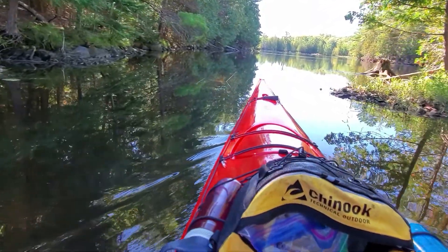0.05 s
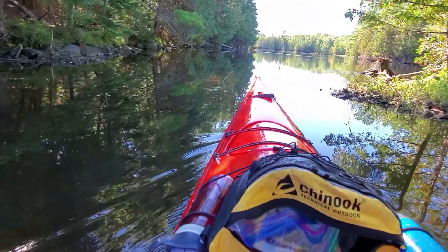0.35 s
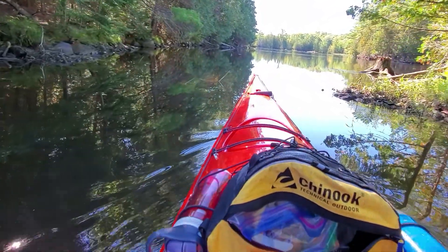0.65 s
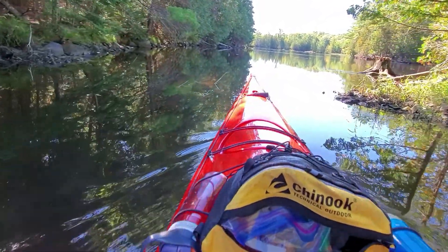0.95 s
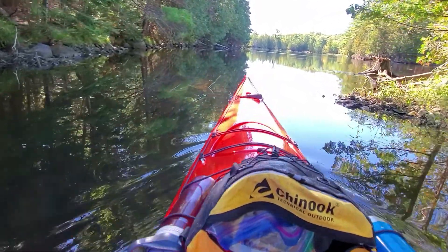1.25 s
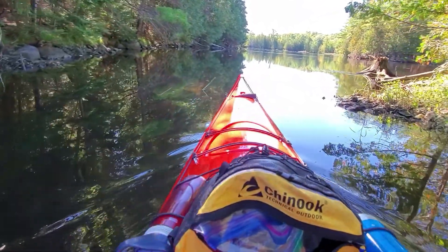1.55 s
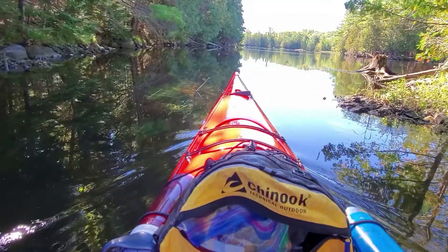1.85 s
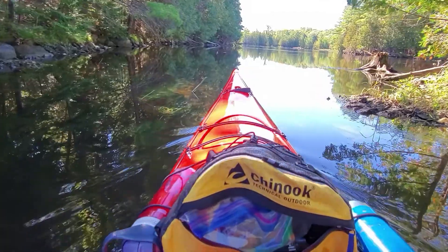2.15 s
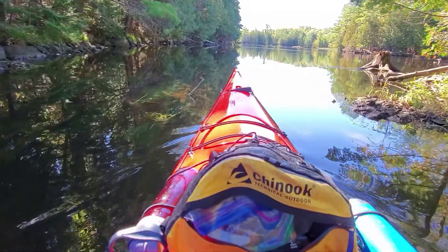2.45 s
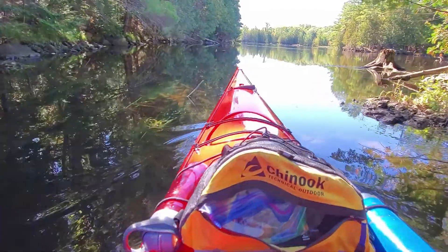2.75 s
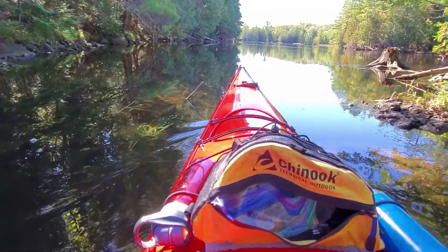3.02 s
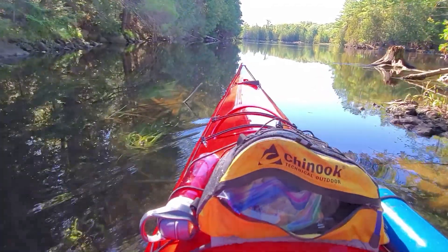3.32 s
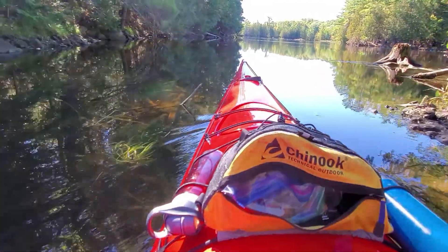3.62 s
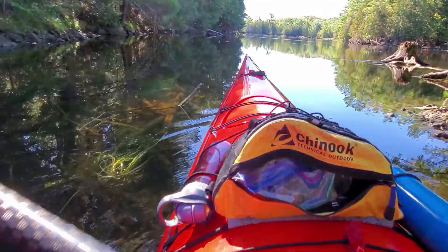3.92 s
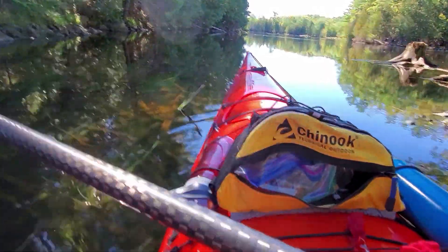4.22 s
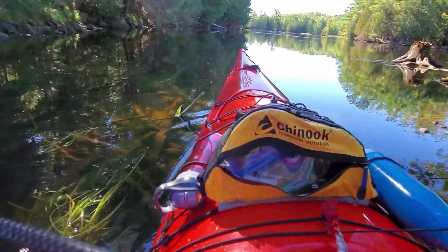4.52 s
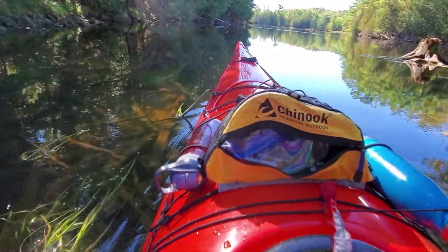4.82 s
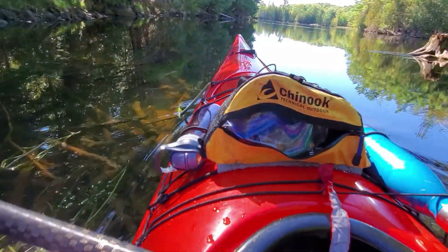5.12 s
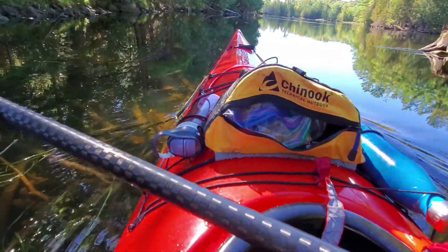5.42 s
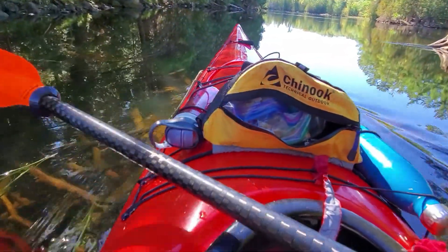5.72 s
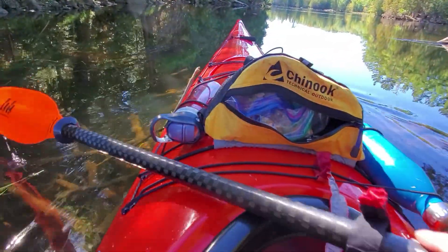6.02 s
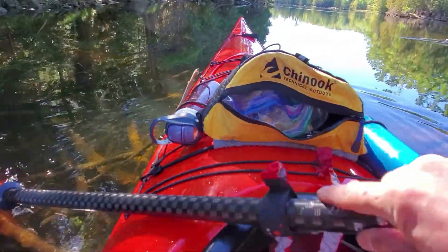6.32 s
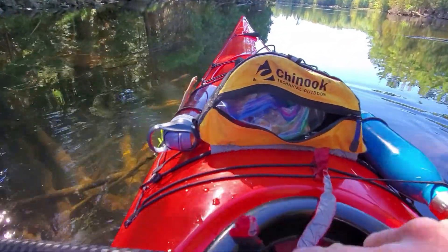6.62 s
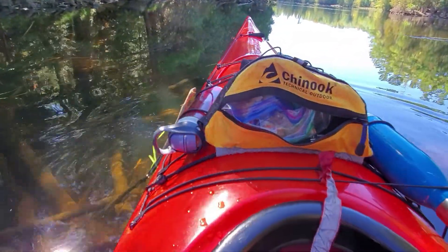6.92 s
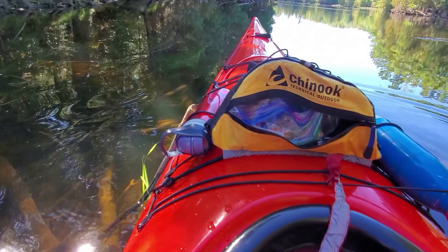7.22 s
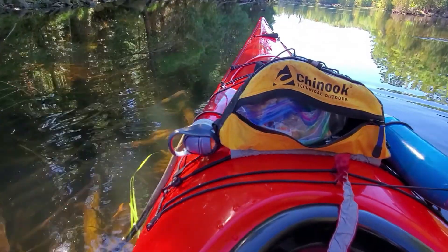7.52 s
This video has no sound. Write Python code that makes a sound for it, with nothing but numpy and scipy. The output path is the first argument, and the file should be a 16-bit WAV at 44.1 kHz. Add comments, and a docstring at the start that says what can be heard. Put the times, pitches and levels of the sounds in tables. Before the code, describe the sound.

A plastic kayak glides on a calm lake, heard close from on board: a soft low hull hum, pattering ripples, small laps and faint grass brushing the side. From about 1.5 to 2 seconds, water plops and splashes on the left, followed by light drips and a trickle. Soft low bumps come around 3 seconds. From 4 to about 5.3 seconds the hull drags over weeds and the bottom, booming and rumbling with a gritty rasp and tiny wet squeaks, ending in a short low groan. Hollow knocks from the paddle and sunken wood start at about 4 and 5 seconds, then come several times, loudest between 6.3 and 7 seconds, with a last one near 7.6. Wavelets slosh against the shell and a few drops tick between the knocks. Distant insects sing very faintly throughout, swelling slightly around 5 seconds.

```python
"""Ripples patter and lap on the hollow hull of a plastic kayak on a calm, shallow lake; water drips and
splashes on the left. The hull booms and rasps as it drags over weeds and the bottom, then the paddle
and sunken wood knock against it. Insects sing on the shore.
Stick-slip friction drives the shell's resonances, blows ring the hull's modes, and drops and splashes
trap ringing bubbles. The insects are two bands of noise."""
import sys
import numpy as np
from scipy import signal
from scipy.io import wavfile
from scipy.ndimage import uniform_filter1d

SR = 44100
rng = np.random.default_rng(int(sys.argv[2]) if len(sys.argv) > 2 else 0)


def wav_out(sig):
    """Save sig, one row per channel (or a flat mono array), as 16-bit PCM at SR to the path in sys.argv[1]."""
    wavfile.write(sys.argv[1], SR, np.round(np.clip(np.atleast_2d(sig).T, -1, 1) * 32767).astype(np.int16))


N = 342216
TIME = np.arange(N) / SR

# Hull modes, lowest first. Each row: frequency in Hz, relative level in dB, T60 in seconds.
HULL_MODES = [(39.7, -19.5, 1), (64, -6, 0.58), (74.9, -12.5, 0.87), (86.6, 8.5, 0.28), (112.5, -3, 0.32),
              (168.5, -2, 0.22), (231.5, 5, 0.17), (276.5, 3.5, 0.076), (312.8, 2, 0.1), (381, 2.5, 0.1),
              (481, -5.5, 0.092), (545.4, -0.5, 0.11), (602, -7, 0.14), (691, -7, 0.069),
              (837, -13.5, 0.15), (1130, -20.5, 0.16), (1410, -18.5, 0.07)]
# Stereo image of the noises. Each row: frequency in Hz, left-right correlation.
CORRELATION = [(60, 0.86), (300, 0.86), (600, 0.72), (1000, 0.096), (2000, 0), (15000, 0)]


def dragging():
    """Weeds and grit slip along the shell: it booms, lower under load, rumbles, rasps and hisses."""
    # Spectra. Each row: frequency in Hz, relative density in dB.
    wall_spectrum = [(120, -11), (230, 3.5), (400, -8.5), (580, -1), (850, -7), (1300, -10)]
    rasp_spectrum = [(700, 2), (1200, -1.5), (1800, 1.5), (2800, -1.5), (4200, 2), (6000, -50),
                     (9000, -12.5)]
    hiss_spectrum = [(3500, 4.5), (5500, -0.5), (7000, 1.5), (8500, -7), (11000, -6.5), (15000, 3.5)]
    boom, wall, rasp, hiss = contact()
    push = rng.standard_normal(N)
    boom_hz = 79.1 * (1 + 0.071 * drift(30) - 0.1306 * boom / boom.max())
    low = np.sin(2 * np.pi * np.cumsum(boom_hz) / SR)
    low += from_db(-9) * evened(resonate_twice(push, 57, 73, 73), 0.056)
    rumble = from_db(1) * wall * shell(friction(wall_spectrum, grain_db=2, grain_hz=149.4, patchy_db=3))
    grit = friction(rasp_spectrum, grain_db=5.5, grain_hz=330, patchy_db=3.5)
    surface = rasp * (from_db(-6) * shell(grit) + squeaks())
    fine_grit = friction(hiss_spectrum, grain_db=-1, grain_hz=397, patchy_db=1.5)
    surface += from_db(1) * hiss * shell(fine_grit)
    return from_db(0.5) * boom * low + rumble + surface * pan(0.83)


def contact():
    """Gains of boom, wall, rasp and hiss: scrape pressure drives all four, bumps only the boom."""
    # Clumps of weeds. Each row: time of full pressure, hold, attack and release in seconds,
    # hiss level in dB, rasp over hiss in dB.
    scrapes = [(4.111, 0.1, 0.018, 0.035, -38, 11), (4.389, 0.058, 0.1, 0.25, -33.5, 6.5),
               (4.606, 0.033, 0.2, 0.18, -35, 0.5), (4.818, 0.065, 0.25, 0.19, -38.5, 0),
               (5.033, 0.038, 0.047, 0.16, -38, 8), (5.168, 0.0092, 0.038, 0.016, -37.5, 2),
               (5.259, 0.049, 0.21, 0.037, -53.5, -27)]
    # The hull rides up on the bottom. Each row: peak time and hold in seconds, level in dB.
    bumps = [(2.674, 0.015, -41), (3.03, 0.022, -37), (3.119, 0.023, -34.5), (3.232, 0.016, -28.5),
             (3.326, 0.016, -37), (4.13, 0.039, -19), (4.338, 0.027, -24.5), (4.472, 0.012, -29),
             (4.991, 0.11, -28), (5.268, 0.03, -30)]
    rasp, hiss = 0, 0
    for s, hold_s, attack_s, release_s, db, rasp_db in scrapes:
        pressure = from_db(db) * swell(s, hold_s, attack_s, release_s)
        rasp = np.maximum(rasp, from_db(rasp_db) * pressure)
        hiss = np.maximum(hiss, pressure)
    boom = from_db(-4) * hiss
    for s, hold_s, db in bumps:
        boom = np.maximum(boom, from_db(db) * swell(s, hold_s, attack_s=0.053, release_s=0.11))
    wall = from_db(-36.5) * (rasp / rasp.max()) ** 0.68
    return boom, wall, rasp, hiss


def knocks(lag_s, mode_spread_db, rebound_s, focus_db):
    """Each blow cracks the shell and rings the hull modes; bending waves bring the low ones later."""
    # Each row: start in seconds, relative levels of wall, boom and crack in dB, favoured pitch in Hz,
    # then the struck spot's own ring: pitch and width in Hz, level in dB.
    blows = [(3.206, -40, -55, -82, 220, 583, 148, -43.5), (4.09, -42, -26, -69, 393, 232, 99, -30),
             (5.04, -27.5, -50, -43, 586, 1100, 400, -23.5), (5.27, -29, -32, -45.5, 520, 1340, 400, -34.5),
             (5.654, -28.5, -33.5, -35, 607, 712, 116, -29), (6.02, -31, -30, -42.5, 210, 1430, 600, -31),
             (6.323, -12, -19, -24, 533, 1680, 445, -21), (6.562, -18, -20, -26, 327, 1800, 685, -13),
             (6.713, -21, -25.5, -29.5, 297, 3380, 200, -25),
             (6.829, -25.5, -20.5, -48, 303, 403, 220, -29), (7.003, -14.5, -23, -28, 286, 328, 199, -14),
             (7.618, -23.5, -38, -36.5, 620, 780, 349, -24.5)]
    # Crowded upper shell modes. Each row: frequency in Hz, relative density in dB, T60 in seconds.
    crack_modes = [(630, 12, 0.083), (960, 2.5, 0.088), (1750, 3, 0.033), (2600, -6, 0.051),
                   (3440, -3.5, 0.025), (6700, -12.5, 0.011), (14000, -12.5, 0.011)]
    out, t = np.zeros((2, N)), TIME[:SR // 2]
    crack_age_s = np.maximum(t[:SR // 8] - rebound_s, 0)
    for s, wall_db, boom_db, crack_db, favoured_hz, ring_hz, width_hz, ring_db in blows:
        boom, wall, crack = 0, 0, 0
        for hz, db, t60_s in HULL_MODES:
            age_s = np.maximum(t - lag_s * np.sqrt(HULL_MODES[0][0] / hz), 0)
            onset = 1 - np.exp(-2 * hz * age_s)
            decay = from_db(db + mode_spread_db * rng.standard_normal() - 60 * age_s / t60_s)
            mode = onset * decay * np.sin(2 * np.pi * hz * age_s)
            if hz < 140:
                boom += mode
            else:   # the struck spot favours modes near one pitch
                favour = from_db(focus_db * np.exp(-(np.log2(hz / favoured_hz) / 0.38) ** 2))
                wall += rng.choice([-1, 1]) * favour * mode * pan(rng.normal(0.99, 2.6))
        white = rng.standard_normal((2, 2, SR // 8))
        for hz, band in bands(white, crack_modes[0][0], crack_modes[-1][0]):
            db, t60_s = at_hz(crack_modes, hz)
            crack += band * from_db(db - 60 * crack_age_s / t60_s)
        add(out, s, from_db(boom_db + 4) * peak_one(boom) + from_db(wall_db + 4) * peak_one(wall))
        add(out, s, from_db(crack_db - 7) * rms_one(shell(crack)) * pan(3.7))
        touch = stereo_noise(len(t), ring_hz) * np.exp(-t / 0.0044)
        ring = resonate_twice(touch, ring_hz, width_hz, 2 * width_hz)
        add(out, s, from_db(ring_db) * peak_one(ring))
    return out


def shell(x):
    """Ring the shell's narrow upper resonances; rms unchanged."""
    # Each row: frequency and width in Hz, gain in dB.
    resonances = [(1157, 42, -1), (1313, 38, -4), (1440, 28, 2), (1600, 62, -0.5), (1757, 14, 2),
                  (1970, 23, -3), (2310, 12, -1), (2817, 47, 1.5), (4090, 34, 1)]
    ringing = sum(from_db(db) * resonate(x, hz, width_hz) for hz, width_hz, db in resonances)
    return rms_one(x + ringing) * np.sqrt(np.mean(x ** 2))


def snags():
    """The hull catches and chatters: coarse slips gather round one resonance."""
    # Each row: centre time and half-length in seconds, pitch in Hz, level in dB.
    catches = [(4.128, 0.018, 1560, -25.5), (4.197, 0.012, 1620, -22), (4.409, 0.074, 1490, -26.5),
               (4.455, 0.026, 1700, -21.5), (4.527, 0.018, 1200, -40), (4.632, 0.024, 355, -36),
               (4.835, 0.055, 2620, -35.5), (5.062, 0.042, 1150, -31.5), (5.827, 0.025, 1490, -43.5),
               (6.213, .012, 1800, -37)]
    out = np.zeros((2, N))
    for s, half_s, hz, db in catches:
        n = int(2 * half_s * SR)
        slips = stereo_noise(n, hz) * from_db(4.5 * drift(450)[:n])
        chatter = evened(shell(resonate_twice(slips, hz, 0.28 * hz, hz)), 0.0098)
        grip = from_db(-40 * np.abs(np.linspace(-1, 1, n)) ** 3)
        add(out, s - half_s, from_db(db) * chatter * grip)
    return out * pan(2.5)


def squeaks(start_s=4.28):
    """For a second, wet stems squeak under the hull, each at its own wavering pitch."""
    out = np.zeros((2, N))
    for delay_s, pitch, length, faintness, place in rng.random((190, 5)):
        hz = 1500 * 4.6 ** pitch
        t = TIME[:int((.012 + .035 * length) * SR)]
        waver = np.cumsum(rng.normal(0, .035, len(t)))
        phase = 2 * np.pi * hz * t + waver + np.pi * place * np.array([[0], [1]])
        envelope = from_db(-14 * faintness - 4 * pitch) * np.hanning(len(t))
        add(out, start_s + delay_s, envelope * np.sin(phase))
    return from_db(-8) * out / out[out != 0].std()


def groan():
    """Regular stick-slip gives a short, low, wavering note with weak overtones."""
    # Each row: time in seconds, pitch in Hz, level in dB.
    contour = [(5.16, 205, -62), (5.174, 202.6, -32.5), (5.225, 181.6, -34), (5.25, 172, -41)]
    s, hz, db = np.transpose(contour)
    phase = 2 * np.pi * np.cumsum(np.interp(TIME, s, hz) * (1 + 0.028 * drift(120))) / SR
    note = sum(gain * np.sin(k * phase) for k, gain in enumerate(from_db([10.5, -2, -4.5, -9.5]), 1))
    return gain_curve(np.transpose([s, db])) * rms_one(note)


def splashes():
    """Water falls beside the boat: plops, gushes of bubbles and spray, then a trickle; a few low plops are air
    gulping under the hull."""
    # Each row: peak time in seconds, relative levels of bubbling and spray in dB.
    gushes = [(1.672, -48, -39.5), (1.775, -28.5, -32), (1.862, -22.5, -25.5)]
    out = plops()
    swarm, spray = 0, 0
    for s, swarm_db, spray_db in gushes:
        gush = swell(s, hold_s=0, attack_s=0.077, release_s=0.069)
        swarm = np.maximum(swarm, from_db(swarm_db) * gush)
        spray = np.maximum(spray, from_db(spray_db) * gush)
    crackle = bubbling(1.55, 2.06, count=750, low_hz=1500, high_hz=5800, cycles=26, spread_db=20)
    mist = bubbling(1.55, 2.06, count=1800, low_hz=8000, high_hz=16000, cycles=12, spread_db=22)
    gurgle = bubbling(1.55, 2.06, count=110, low_hz=650, high_hz=1600, cycles=14, spread_db=12)
    trickle = bubbling(2.35, 3.22, count=170, low_hz=1700, high_hz=6000, cycles=45, spread_db=15)
    out += swarm * (from_db(-4.5) * evened(resonate(crackle, 2900, 8000), 0.018) + from_db(-18) * gurgle)
    out += from_db(-54.5) * swell(2.84, hold_s=0, attack_s=0.89, release_s=0.05) * trickle
    return out * pan(4.7) + from_db(-6.5) * spray * evened(mist, 0.067) * pan(5.5)


def plops(splat_decay_s=0.017):
    """Larger bubbles ring, each with a splat of water; a few low ones are air gulping under the hull."""
    # Each row: start in seconds, pitch in Hz, level in dB, fractional pitch rise over the ring.
    large_bubbles = [(1.474, 2560, -26.5, 2.1), (1.484, 2490, -27, 2.1), (1.666, 938, -32, 0.51),
                     (1.731, 923, -37.5, -0.5), (1.743, 3620, -24, 2.5), (1.752, 944, -32, 1.6),
                     (1.788, 2570, -22.5, 0.5), (1.829, 2820, -28, 0.27), (1.932, 2160, -33.5, 0.83),
                     (2.358, 1790, -44, 0.18), (2.469, 1690, -42, 0.79), (2.493, 723, -46.5, 1.6),
                     (2.628, 2500, -43, 0.5), (2.643, 396, -46, 1.5), (2.814, 4960, -40, 0.35),
                     (2.841, 3400, -37, 0.3), (2.955, 221, -40.5, 0), (3.075, 1840, -44.5, 1.3),
                     (7.219, 1185, -39.5, 0), (7.297, 597, -41, 1.5)]
    out, t = np.zeros((2, N)), TIME[:SR // 20]
    for s, hz, db, rise in large_bubbles:
        splat = resonate_twice(stereo_noise(len(t), hz), hz, hz, hz) * np.exp(-t / splat_decay_s)
        add(out, s, from_db(db - 4) * peak_one(splat))
        add(out, s, from_db(db) * bubble(hz, cycles=77, rise=rise))
    return out


def drops(tick_db, ring_db):
    """A drop lands with a sharp tick and traps a tiny ringing bubble."""
    # Each row: start in seconds, relative level in dB, pitch in Hz, left over right in dB.
    landings = [(0.9472, -36.5, 5300, 8), (0.967, -34.5, 14200, 0), (1.2696, -30, 14000, -3),
                (1.5375, -31, 13400, 8), (1.6597, -25.5, 5150, 6), (1.686, -26, 4730, 9),
                (1.8727, -16.5, 14300, 28), (2.835, -30.5, 5350, 17), (2.9, -27, 14200, 13),
                (3.588, -30, 6770, 6), (3.765, -29.5, 15200, 24.5), (6.2087, -21, 4110, 5),
                (6.209, -21.5, 10800, 12.5), (6.256, -34, 12500, 6), (6.273, -36, 10900, 6),
                (6.521, -27, 14400, 3), (6.9014, -28.5, 14200, 5), (7.673, -33.5, 8900, 8)]
    out, t = np.zeros((2, N)), TIME[:SR // 30]
    impact = np.exp(-t / .0008) + .03 * np.exp(-t / .006)
    for s, db, hz, left_db in landings:
        burst = rng.standard_normal((2, len(t))) * impact
        tick = resonate_twice(burst, hz, 2200, 4400) + .22 * high_pass(burst, 5000, order=2)
        add(out, s, from_db(db + tick_db) * peak_one(tick) * pan(left_db))
        add(out, s, from_db(db + ring_db) * bubble(hz, cycles=86, rise=0.16) * pan(left_db))
    return out


def laps(hollow_db, attack_s=0.00089):
    """Wavelets slosh against the side: soft, lumpy pushes coloured by the hollow hull."""
    # Each row: start in seconds, seconds to fade 20 dB, peak in dB, pitch in Hz.
    wavelets = [(0.577, 0.1, -45.5, 380), (0.78, 0.035, -40.5, 406), (1.025, 0.028, -46, 605),
                (1.074, 0.026, -49, 564), (1.211, 0.029, -46.5, 480), (1.279, .05, -41, 410),
                (1.329, 0.088, -46, 470), (1.461, 0.22, -42, 395), (2.792, 0.18, -43, 250),
                (3.107, 0.02, -40, 333), (3.939, 0.025, -36, 293), (5.441, 0.16, -30, 480),
                (5.495, 0.031, -38, 480), (5.553, 0.017, -32, 600), (5.775, 0.068, -34, 517),
                (5.952, 0.018, -31, 840), (5.978, 0.016, -31, 600), (6.013, 0.085, -27, 605),
                (7.219, 0.06, -36, 570), (7.673, 0.045, -34, 420), (7.707, 0.059, -39, 477)]
    out, t = np.zeros((2, N)), TIME[:SR // 3]
    for s, fade_s, db, hz in wavelets:
        push = stereo_noise(len(t), hz) * from_db(3 * drift(110)[:len(t)])
        envelope = (1 - np.exp(-t / attack_s)) * from_db(-20 * t / fade_s)
        slosh = evened(resonate_twice(push, hz, hz, 2 * hz), 0.0297) * envelope
        hollow = sum(from_db(mode_db) * resonate(slosh, mode_hz, np.log(1000) / np.pi / t60_s)
                     for mode_hz, mode_db, t60_s in HULL_MODES)
        add(out, s, from_db(db) * peak_one(slosh + from_db(hollow_db) * hollow))
    return out


def gliding():
    """Moving water keeps a low hull mode humming; ripples patter on the shell."""
    # Level curves. Each row: time in seconds, relative level in dB.
    hum_levels = [(0, -47.5), (1, -44.5), (1.7, -49), (1.98, -56.5), (2.42, -44), (3.35, -43.5),
                  (3.55, -44), (6.2, -46), (7.76, -46)]
    ripple_levels = [(0, -66), (.6, -60.5), (.95, -59.5), (1.17, -64), (1.7, -57.5), (2.25, -63.5),
                     (2.7, -59), (5.9, -54.5), (6.5, -47.5), (7.3, -56.5), (7.76, -44)]
    # Each row: frequency in Hz, relative density in dB.
    patter_spectrum = [(110, -4), (170, 3.5), (240, -4.5), (460, -4), (600, -10.5), (800, -16),
                       (1200, -19.5), (2500, -18.5)]
    mode = resonate(rng.standard_normal(N), 75.9, 4.3)
    hum = gain_curve(hum_levels) * evened(resonate(mode, 70, 33), 0.057)
    patter = gain_curve(ripple_levels) * friction(patter_spectrum, grain_db=3, grain_hz=89.4, patchy_db=6.5)
    return from_db(-4) * hum + from_db(1.5) * patter


def grass(bow_db):
    """Tufts rustle and hiss along the side; between them the bow hisses as it parts the water."""
    # Each row: centre time and half-height width in seconds, hiss and rustle levels in dB.
    tufts = [(0.136, 0.11, -55, -61.5), (0.7, 0.29, -55.5, -59.5), (1.954, 0.84, -53.5, -56),
             (2.816, 0.49, -57.5, -56.5), (3.494, 0.46, -50.5, -53), (5.58, 0.49, -59.5, -65.5),
             (6.243, 0.49, -55, -51.5), (6.463, 0.6, -58, -52), (6.904, 0.14, -52.5, -47),
             (7.505, 1, -52.5, -54)]
    # Spectra. Each row: frequency in Hz, relative density in dB.
    rustle_spectrum = [(700, -4), (1200, 1.5), (2000, -5), (3400, 2.5), (4500, -4.5)]
    hiss_spectrum = [(3500, -9.5), (5000, 0), (7000, 2.5), (8500, -6), (11000, 0), (15000, 5.5)]
    rustle, hiss = 0, from_db(bow_db)
    for s, width_s, hiss_db, rustle_db in tufts:
        touch = bell(s, width_s)
        rustle = np.hypot(rustle, from_db(rustle_db) * touch)
        hiss = np.hypot(hiss, from_db(hiss_db) * touch)
    out = rustle * friction(rustle_spectrum, grain_db=2, grain_hz=305, patchy_db=3)
    out += hiss * friction(hiss_spectrum, grain_db=2, grain_hz=393, patchy_db=3)
    return out * pan(1.5)


def paddle_drips():
    """Tiny drips land at random, each a short high tick."""
    ticks = bubbling(0, N / SR, count=110, low_hz=9500, high_hz=15500, cycles=12, spread_db=16)
    return from_db(-71.5) * ticks * pan(1.6)


def shore():
    """A distant insect chorus in two narrow bands, louder for a while, over faint air."""
    # Each row: frequency and width in Hz, level in dB, rise at the loudest in dB.
    insects = [(3960, 690, -67.5, 7), (15000, 2200, -70.5, 4)]
    # Each row: frequency in Hz, relative density in dB.
    air_spectrum = [(30, 9), (60, 26), (150, 10), (500, 12), (1000, -4), (2500, -21), (6000, -6),
                    (15000, -25)]
    chorus = 0
    for hz, width_hz, db, rise_db in insects:
        song = rms_one(resonate_twice(rng.standard_normal((2, N)), hz, width_hz, width_hz))
        chorus += from_db(db + rise_db * bell(5.1, width_s=1.6)) * song
    return chorus + from_db(-63) * friction(air_spectrum, grain_db=-3, grain_hz=29, patchy_db=2)


def friction(spectrum, grain_db, grain_hz, patchy_db):
    """Noise of uneven little slips, its colour wandering band by band; rms about 1."""
    white = rng.standard_normal((2, 2, N)) * from_db(grain_db * drift(grain_hz))
    coloured = sum(band * from_db(at_hz(spectrum, hz) + patchy_db * drift(35))
                   for hz, band in bands(white, spectrum[0][0], spectrum[-1][0]))
    return evened(coloured, 0.19)


def bubble(hz, cycles, rise):
    """A bubble glides in pitch and decays 60 dB in `cycles` periods; the right side lags in phase."""
    age = np.arange(int(cycles / hz * SR) + 8) * hz / SR / cycles
    phase = 2 * np.pi * cycles * (age + rise * age ** 2 / 2)
    lag_rad = np.array([[0], [rng.uniform(0.54, 2.8)]])
    return np.sin(phase - lag_rad) * from_db(-60 * age) * (1 - np.exp(-age * cycles))


def bubbling(start_s, end_s, count, low_hz, high_hz, cycles, spread_db):
    """A swarm of bubbles of random pitch and level; rms 1 over its span."""
    out, span_s = np.zeros((2, N)), end_s - start_s
    for when, pitch, faintness in rng.random((count, 3)):
        ring = bubble(low_hz * (high_hz / low_hz) ** pitch, cycles, rise=0.52)
        add(out, start_s + when * span_s, from_db(-spread_db * faintness) * ring)
    return out / np.sqrt(np.mean(out ** 2) * N / SR / span_s)


def bands(white, low_hz, high_hz):
    """Yield centre Hz and stereo half-octave band, alternating between two mid-side noise pairs."""
    edges_hz = 22 * 2 ** np.arange(0, 10, .5)
    for k, (low, high) in enumerate(zip(edges_hz, edges_hz[1:])):
        if high > low_hz and low < high_hz:
            hz = np.sqrt(low * high)
            sos = signal.butter(2, [low, high], "band", fs=SR, output="sos")
            yield hz, left_right(*signal.sosfilt(sos, white[k % 2]), hz)


def stereo_noise(n, hz):
    """White noise with the stereo correlation at hz."""
    return left_right(*rng.standard_normal((2, n)), hz)


def left_right(mid, side, hz):
    """Mid-side to stereo; the channels agree only for low hz."""
    alike = at_hz(CORRELATION, hz)
    return np.sqrt(1 + alike) * mid + np.sqrt(1 - alike) * side * [[1], [-1]]


def resonate(x, hz, width_hz):
    """Two-pole resonance, peak gain 1."""
    r = np.exp(-np.pi * width_hz / SR)
    feedback = [1, -2 * r * np.cos(2 * np.pi * hz / SR), r * r]
    return signal.lfilter(np.array([1, 0, -1]) * (1 - r * r) / 2, feedback, x + 1e-18)


def resonate_twice(x, hz, width1_hz, width2_hz):
    """Two resonances in series at one pitch."""
    return resonate(resonate(x, hz, width1_hz), hz, width2_hz)


def high_pass(x, hz, order):
    """Cut below hz."""
    return signal.sosfilt(signal.butter(order, hz, "high", fs=SR, output="sos"), x)


def evened(x, span_s):
    """Hold the rms near 1 over span_s; faster grain stays."""
    power = uniform_filter1d(np.mean(np.atleast_2d(x) ** 2, axis=0), max(2, int(span_s * SR)))
    return x / np.sqrt(np.abs(power) + 1e-3 * np.mean(x ** 2))


def swell(s, hold_s, attack_s, release_s):
    """Gain rising 20 dB per attack_s until s, holding at 1, falling 20 dB per release_s."""
    away = np.maximum(s - TIME, 0) / attack_s + np.maximum(TIME - s - hold_s, 0) / release_s
    return from_db(-20 * np.minimum(away, 10))


def bell(s, width_s):
    """Bell-shaped gain centred on s, width_s wide at half height."""
    return .5 ** np.minimum((2 * (TIME - s) / width_s) ** 2, 20)


def gain_curve(points):
    """Gain through (seconds, dB) points, silent from 20 ms outside their span."""
    s, db = np.transpose(points)
    gate = np.interp(TIME, [s[0] - .02, s[0], s[-1], s[-1] + .02], [0, 1, 1, 0])
    return gate * from_db(np.interp(TIME, s, db))


def drift(rate_hz):
    """Random wander, rms 1."""
    knots = rng.standard_normal(4000)
    return rms_one(np.interp(TIME * rate_hz, np.arange(len(knots)), knots))


def at_hz(points, hz):
    """Interpolate a table's columns on a log frequency axis."""
    table_hz, *columns = np.transpose(points)
    return np.squeeze([np.interp(np.log(hz), np.log(table_hz), column) for column in columns])


def add(out, s, sound):
    """Mix a sound in at s seconds."""
    i = max(0, int(s * SR))
    out[:, i:i + sound.shape[-1]] += sound[..., :max(0, N - i)]


def pan(left_db):
    """Channel gains, left over right by left_db."""
    return from_db(np.array([[.5], [-.5]]) * left_db)


def from_db(db):
    """Decibels to gain."""
    return 10 ** (np.asarray(db) / 20)


def rms_one(x):
    """Scale to rms 1."""
    return x / np.sqrt(np.mean(x ** 2) + 1e-20)


def peak_one(x):
    """Scale to peak 1."""
    return x / np.abs(x).max()


def scene():
    """The hull, the water beside it and the shore."""
    hull = gliding() + grass(bow_db=-67) + dragging() + snags() + groan() + laps(hollow_db=18.5)
    hull += knocks(lag_s=0.0047, mode_spread_db=0.5, rebound_s=0.0041, focus_db=7)
    return hull + drops(tick_db=3, ring_db=-6) + paddle_drips() + splashes() + shore()


def record(dry):
    """The microphones lose the deepest bass, the right one slightly more, and the top is cut."""
    left, right = high_pass(dry, 36, order=4)
    thin = np.array([left, high_pass(right, 11, order=1)])
    return signal.sosfilt(signal.ellip(10, .2, 80, 15900, fs=SR, output="sos"), thin)


dry = scene()
out = record(dry)
wav_out(out)
```